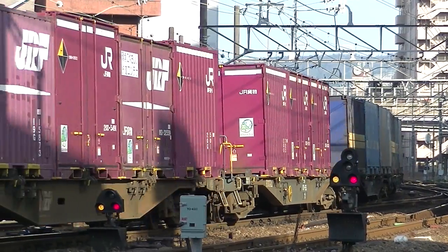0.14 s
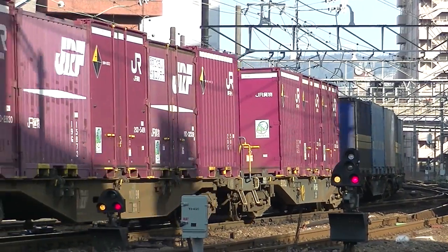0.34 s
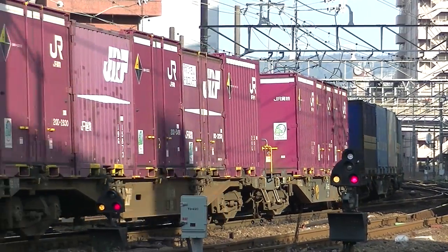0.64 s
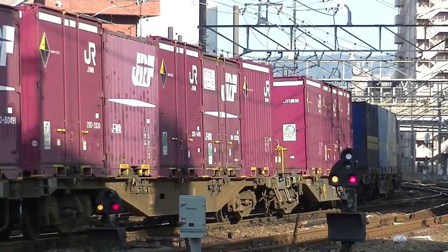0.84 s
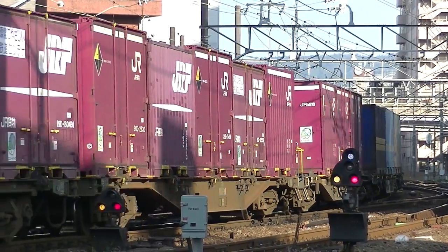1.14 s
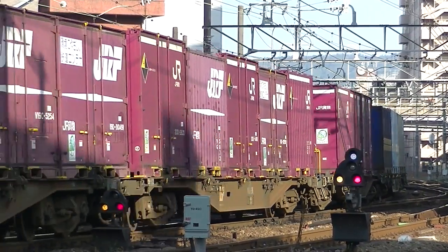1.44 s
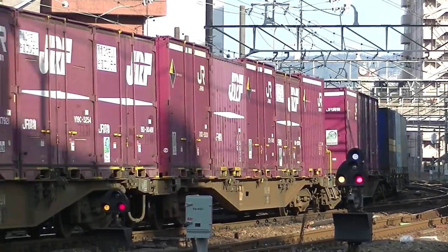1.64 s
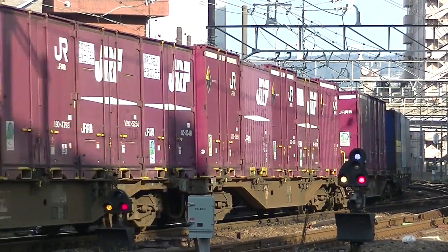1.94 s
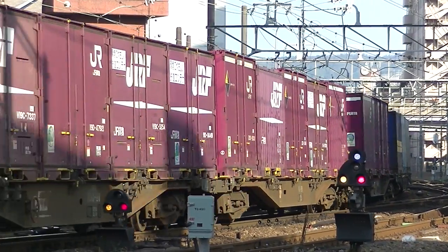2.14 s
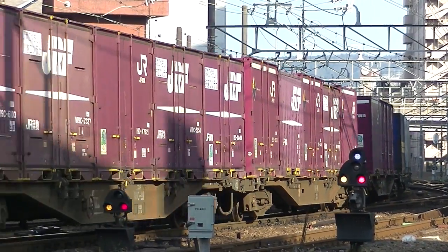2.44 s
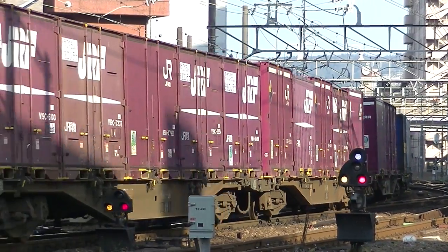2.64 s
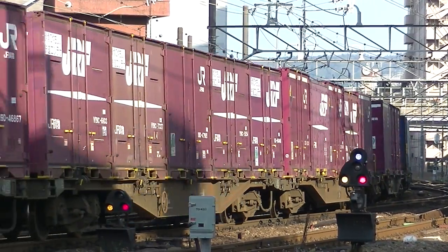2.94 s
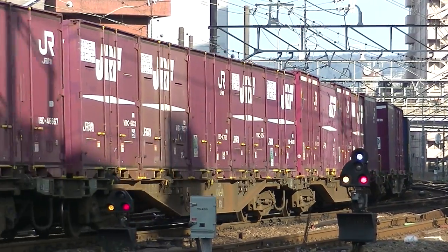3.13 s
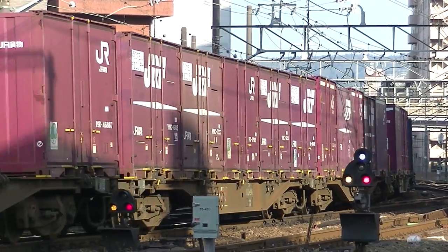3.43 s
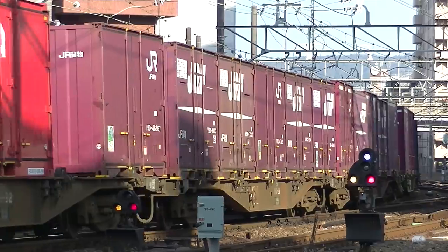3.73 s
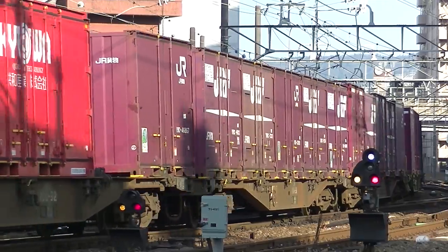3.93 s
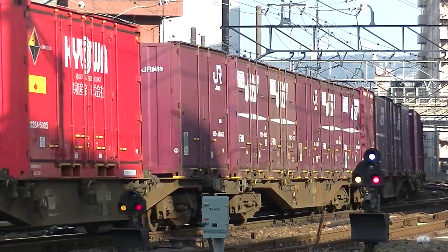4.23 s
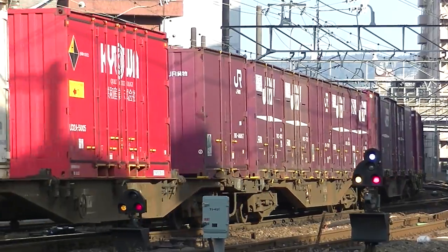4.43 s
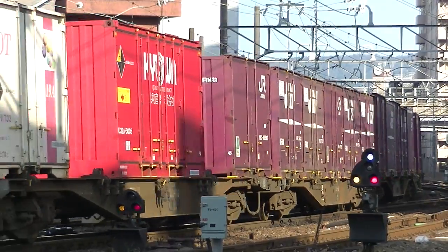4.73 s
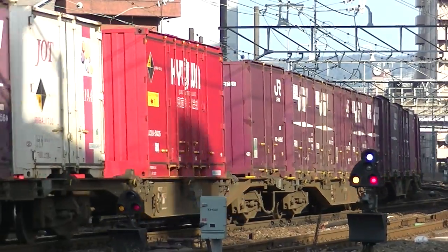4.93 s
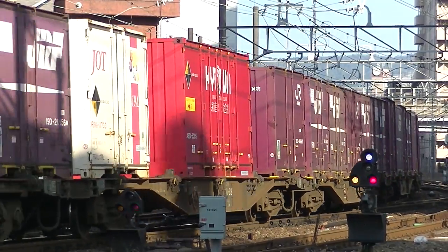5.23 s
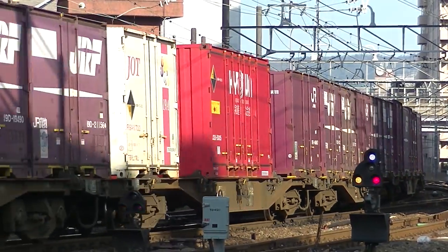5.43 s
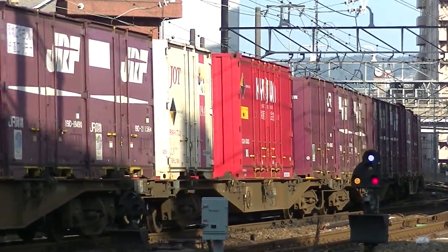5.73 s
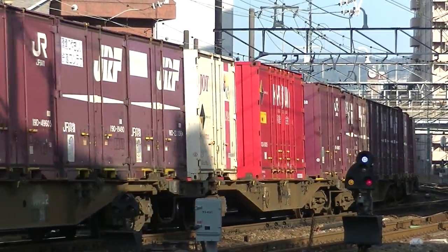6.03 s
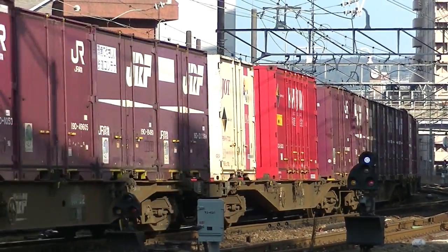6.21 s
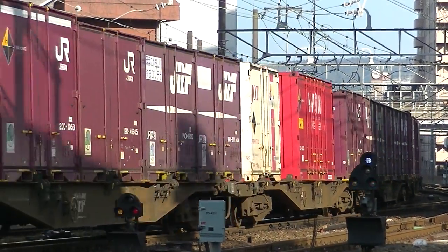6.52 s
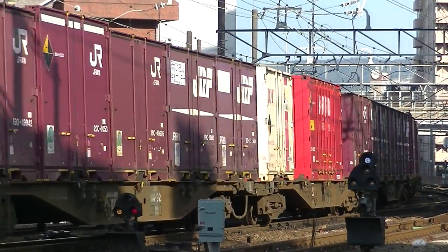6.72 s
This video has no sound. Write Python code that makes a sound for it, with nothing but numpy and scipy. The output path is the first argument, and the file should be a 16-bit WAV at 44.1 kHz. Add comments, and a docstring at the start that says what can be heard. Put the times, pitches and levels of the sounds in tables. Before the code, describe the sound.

A slow freight train rolls past with high, wavering wheel squeals and metallic scraping that ease off over rumbling and rail-joint knocks.

```python
"""Wheel flanges grind and squeal as container wagons crawl through a curved yard track a few metres away.
The flanges scrape the rail and ring the steel wheels; single wheel modes break into stick-slip squeal.
Underneath, rough treads shake the wagon bodies and axles thump over rail joints. One dry snap sounds
close by. Wagon sides and yard scatter the train's sound into short echoes that widen it."""
import sys
import numpy as np
from scipy import signal
from scipy.fft import rfft, irfft, next_fast_len
from scipy.io import wavfile
from scipy.ndimage import uniform_filter1d

SR = 44100
rng = np.random.default_rng(int(sys.argv[2]) if len(sys.argv) > 2 else 0)


def waveform_to_disk(signal):
    """Save audio, clipped to [-1, 1], as 16-bit WAV at the path in sys.argv[1]."""
    frames = np.transpose(np.atleast_2d(signal))
    scaled = np.clip(frames, -1, 1) * 32767
    samples = np.round(scaled).astype(np.int16)
    wavfile.write(sys.argv[1], SR, samples)


N = 302967
T = np.arange(N) / SR


def undb(db):
    return 10 ** (np.asarray(db) / 20)


def unit(x):
    """Scale to rms 1."""
    return x / np.sqrt(np.mean(np.abs(x) ** 2))


def butter(x, order, hz, kind="lowpass"):
    return signal.sosfilt(signal.butter(order, hz, kind, fs=SR, output="sos"), x)


def colour(x, points):
    """Filter by (f/Hz, gain/dB) points joined on a log-frequency axis."""
    hz, db = np.transpose(points)
    size = next_fast_len(len(x))
    bin_hz = np.maximum(np.arange(size // 2 + 1) * SR / size, 1)
    gain = undb(np.interp(np.log(bin_hz), np.log(hz), db))
    return irfft(rfft(x, size) * gain, size)[:len(x)]


def ring(x, hz, width_hz):
    """One resonance, gain 1 at its centre."""
    return signal.lfilter(*signal.iirpeak(hz, hz / width_hz, fs=SR), x)


def walk(rate_hz, size=N):
    """Random steps, smoothed twice; spread near 1."""
    hold = int(SR / rate_hz)
    steps = np.repeat(rng.standard_normal(size // hold + 1), hold)
    return 1.15 * uniform_filter1d(uniform_filter1d(steps, hold), hold)[:size]


def air():
    """Faint deep stir on the microphone, independent left and right."""
    return unit(butter(rng.standard_normal((2, N)), 4, 100)) * undb(-77)


# Echo against direct sound: f/Hz, gain/dB
ECHO_SPECTRUM = [(60, -55), (200, -11), (380, -7), (700, -15), (1290, -14.5), (2380, -13), (4400, -17.5),
                 (8120, -15.5), (15000, -39)]


def yard_echo(train, t60_s=0.23):
    """Wagon sides and yard scatter the sound into a short diffuse tail."""
    t = T[:SR // 2]
    tail = rng.standard_normal(len(t)) * np.exp(-np.log(1000) * t / t60_s)
    tail /= np.sqrt(np.sum(tail ** 2))
    return colour(signal.fftconvolve(train, tail)[:N], ECHO_SPECTRUM)


# Left minus right, before frequency weighting: t/s, level/dB
BALANCE = [(0, 3), (2.5, 0.3), (5.3, -.5), (6.87, 0)]
# Quarter-cycle share by which the left microphone port leads: f/Hz, gain/dB
LEFT_LEAD = [(120, -44), (340, -47), (600, -50), (1200, -13)]


def direction(train):
    """Side signal: the train leans left at first, and the left port leads in phase."""
    ratio = undb(np.interp(T, *np.transpose(BALANCE)))
    lean = (ratio - 1) / (ratio + 1) * colour(train, [(100, -19), (3000, 7.5), (4500, 0), (15000, -31)])
    lead_band = colour(train, [(40, -60), *LEFT_LEAD, (3000, -60)])
    lead = -signal.hilbert(lead_band, next_fast_len(N))[:N].imag
    return lean + lead


# Modes of a tiny object: f/Hz, level/dB, t60/s
TICK_MODES = [(4000, -2, .003), (6600, -2, .003), (8600, 0, .003), (11000, -4, .002), (13500, -7, .0015)]


def snap(start_s=4.1241, gap_s=0.00046, peak_db=-4.5):
    """Two ticks ring a few very short modes; a tiny object radiates no bass."""
    t = np.maximum(T - start_s, 0)
    tick = sum(undb(db) * np.sin(2 * np.pi * hz * t) * np.exp(-np.log(1000) * t / t60_s)
               for hz, db, t60_s in TICK_MODES)
    pair = butter(tick + np.roll(tick, int(gap_s * SR)), 4, 3000, "highpass")
    return undb(peak_db) * pair / np.abs(pair).max()


# Axle blows: t/s, thud level/dB, clack level/dB
AXLE_BLOWS = [(.08, -40, -37), (.52, -41.5, -47), (.786, -49, -26), (.919, -46, -34.5), (1.128, -45, -34),
              (1.39, -52, -45), (1.548, -38.5, -32.5), (2.395, -41, -34.5), (2.489, -43.5, -37),
              (2.999, -49, -37), (3.24, -40, -41), (3.679, -42, -37), (3.55, -54, -56), (3.88, -39, -33.5),
              (4.379, -41, -37), (4.499, -38.5, -38.5), (4.599, -41, -35.5), (5.178, -42, -39),
              (5.392, -37.5, -39), (5.785, -40.5, -54), (6.016, -38.5, -38), (6.109, -38.5, -35.5),
              (6.458, -43.5, -40), (6.66, -53, -39.5)]
# Rail and wheel web modes: f/Hz
CLACK_MODES_HZ = [1070, 1560, 2060, 2430, 2910, 3410]


def rail_joints(thud_hz=449, thud_width_hz=370, clack_width_hz=280):
    """Each axle blow at a joint: a soft thud of the wagon floor and a rattling steel clack."""
    out, t = np.zeros(N), T[:SR // 5]
    soft = (1 - np.exp(-t / 0.0021)) * np.exp(-t / 0.053)
    sharp = (1 - np.exp(-t / 0.004)) * np.exp(-t / 0.035)
    for start_s, thud_db, clack_db in AXLE_BLOWS:
        floor_noise, steel_noise = rng.standard_normal((2, len(t)))
        thud = ring(ring(floor_noise * soft, thud_hz, thud_width_hz), thud_hz, thud_width_hz)
        rattle = steel_noise * sharp * undb(4 * walk(250, len(t)))
        clack = sum(ring(ring(rattle, hz, clack_width_hz), hz, clack_width_hz) for hz in CLACK_MODES_HZ)
        blow = undb(thud_db) * unit(thud) + undb(clack_db) * unit(clack)
        start = int(start_s * SR)
        out[start:start + len(t)] += blow[:N - start]
    return out


# Rumble spectrum: f/Hz, level/dB
RUMBLE_SPECTRUM = [(24, -74), (40, -44), (86, -40), (165, -10.5), (325, -3), (386, 1.5), (555, -1),
                   (1250, -4.5), (1740, -3.5), (2000, -2), (2500, -4.5), (3250, -25), (5500, -120)]
# Rumble envelope: t/s, level/dB
RUMBLE_LEVEL = [(0.0, -32.5), (0.61, -33.5), (1.01, -28.5), (1.7, -34.5), (2.2, -34), (2.33, -31),
                (3.88, -30.5), (4.15, -34), (4.36, -31.5), (4.48, -31.5), (4.95, -32.5), (5.99, -30.5),
                (6.31, -37), (6.5, -36), (6.64, -33), (6.87, -34)]


def rumble():
    """Rough treads shake wagon bodies, rails and sleepers."""
    shake = colour(rng.standard_normal(N), RUMBLE_SPECTRUM) * undb(walk(9))
    return unit(shake) * undb(np.interp(T, *np.transpose(RUMBLE_LEVEL)))


# Steel wheel mode families: f/Hz, level/dB
WHEEL_MODES = [(2060, -3), (2480, -1), (2950, -1.5), (3250, 3), (3990, 4.5), (4330, 3), (4900, 0),
               (5150, -6), (6080, -6.5), (6620, -12), (7100, -8.5), (7350, -34), (8250, -7), (8900, -13.5),
               (9400, -18.5), (10400, -15), (12200, -15), (13300, -19), (14100, -13.5)]


def wheel_ring(rub_s=0.8, wheels_at_once=2, wear_spread=0.02):
    """Wheel after wheel takes the curve, each ringing its own modes, detuned by wear."""
    span = int(rub_s * SR)
    out = np.zeros(N + 2 * span)
    for start in range(0, N + span, span // wheels_at_once):
        scrape, wheel = rng.standard_normal(span), 0
        for hz, db in WHEEL_MODES:
            worn_hz = hz * (1 + wear_spread * rng.standard_normal())
            mode = unit(ring(scrape, worn_hz, width_hz=95 - 0.005 * hz))
            wheel += undb(db + 3.5 * walk(10, span)) * mode
        out[start:start + span] += wheel * np.sqrt(np.hanning(span))
    return unit(out[span:span + N])


# Flange rasp spectrum: f/Hz, level/dB
RASP_SPECTRUM = [(900, -24.5), (1500, -12), (2000, 3), (3300, 3), (5100, -2), (6000, -4.5), (7300, -12),
                 (7800, -18), (10000, -15), (15500, -65)]
# Flange contact: t/s, grind level/dB, treble re grind/dB
FLANGE_CONTACT = [(0, -18.5, -11), (.17, -21.5, -13.5), (.21, -18.5, -11), (.5, -19, -11), (.67, -16, -14),
                  (.75, -21, -13), (.87, -22, -16), (1.11, -24.5, -13), (1.35, -20, -18),
                  (1.39, -17.5, -15.5), (1.59, -20, -19.5), (1.62, -15.5, -13), (1.68, -18.5, -17),
                  (1.74, -18, -12.5), (2.15, -15, -14.5), (2.4, -21.5, -12.5), (2.58, -29, -16),
                  (2.89, -29.5, -23), (3.21, -30.5, -22), (3.25, -27, -25), (3.44, -28.5, -20),
                  (3.5, -24, -12.5), (3.66, -25.5, -15), (3.83, -30, -20), (3.88, -26.5, -18.5),
                  (4.07, -31, -24.5), (4.28, -29, -21), (4.33, -27, -19), (4.45, -24, -21.5),
                  (4.72, -26.5, -23), (4.9, -25.5, -17), (5.13, -28, -19.5), (5.38, -27, -21.5),
                  (5.43, -23.5, -19.5), (5.7, -20.5, -16), (6.01, -26.5, -24.5), (6.05, -25, -20),
                  (6.24, -34, -28), (6.29, -27.5, -29), (6.43, -32, -18), (6.48, -28.5, -21.5),
                  (6.62, -33, -22.5), (6.73, -30.5, -24), (6.87, -39, -28)]


def flange_grind(edge_hz=5600, treble_hz=7700):
    """Flanges rasp on the rail and ring the wheels; harder contact is brighter. Returns sound, level."""
    times_s, levels_db, trebles_db = np.transpose(FLANGE_CONTACT)
    grind_db, treble_db = np.interp(T, times_s, levels_db), np.interp(T, times_s, trebles_db)
    rasp = unit(colour(rng.standard_normal(N) * undb(1.7 * walk(60)), RASP_SPECTRUM))
    steel = rasp + undb(-0.5) * wheel_ring()
    low = unit(butter(steel, 8, edge_hz))
    edge = unit(butter(steel, 6, [edge_hz, treble_hz], "bandpass")) * undb(0.36 * treble_db - 1)
    treble = unit(butter(steel, 8, treble_hz, "highpass")) * undb(treble_db)
    return undb(grind_db) * (low + edge + treble), grind_db


def stick_slip(hz, size, roughness, wander_hz):
    """Self-excited mode, rms near 1: pitch wanders and chatter smears it, the rougher the wider."""
    phase = 2 * np.pi * np.cumsum(hz + wander_hz * walk(39.3, size)) / SR
    slip = rng.standard_normal(size) + 1j * rng.standard_normal(size)
    width_hz = 55 * roughness
    chatter = unit(signal.lfilter([1], [1, -np.exp(-np.pi * width_hz / SR)], slip))
    return np.sqrt(2 / (1 + roughness ** 2)) * np.real((1 + roughness * chatter) * np.exp(1j * phase))


# Long squeal envelope: t/s, level/dB
LONG_SQUEAL_LEVEL = [(0, -24.5), (.16, -27), (.2, -16.5), (.34, -21.5), (.75, -26), (.87, -18.5),
                     (1.1, -20), (1.28, -18.5), (1.6, -15), (1.83, -24)]


def long_squeal(hz=5129, fade_s=0.027):
    """One wheel mode sings on through the opening."""
    times_s, levels_db = np.transpose(LONG_SQUEAL_LEVEL)
    envelope = undb(np.interp(T, times_s, levels_db)) * np.clip((times_s[-1] - T) / fade_s, 0, 1)
    return stick_slip(hz, N, roughness=0.6, wander_hz=13) * envelope


# Squeals of single wheel modes: t/s, length/s, f/Hz, level/dB
SHORT_SQUEALS = [(0.157, 0.32, 2090, -28.5), (0.187, 0.066, 3030, -19), (.2, 0.21, 3306, -19),
                 (.22, 0.28, 7340, -29), (0.238, 0.29, 5214, -16.5), (0.241, 0.36, 4110, -20.5),
                 (.36, .2, 8500, -35), (0.339, 0.56, 6970, -24.5), (0.388, 0.18, 3045, -19),
                 (0.553, 0.28, 6900, -30), (0.569, 0.11, 2590, -27.5), (.61, 0.29, 8200, -37),
                 (0.676, 0.29, 3360, -25.5), (.77, 0.3, 8600, -36.5), (0.944, 0.65, 3386, -30.5),
                 (.4, .4, 12790, -45), (1.62, 0.18, 4400, -27), (1.62, 0.12, 9460, -30),
                 (1.62, 0.38, 2493, -18.5), (1.618, 0.29, 3210, -18), (1.61, 0.12, 10550, -36),
                 (1.62, 0.22, 11510, -37), (1.609, .28, 6770, -31), (1.617, 0.19, 7260, -21),
                 (1.617, 0.49, 4040, -21.5), (1.67, .1, 8400, -45), (1.684, 0.29, 7310, -28),
                 (1.747, 0.27, 6940, -24), (1.718, 0.26, 5016, -19.5), (1.759, 0.34, 2043, -19),
                 (1.81, .15, 5820, -26), (1.88, 0.4, 4810, -24), (1.677, 0.47, 8960, -36.5),
                 (1.858, 0.52, 9350, -32.5), (1.9, 0.46, 5070, -19), (1.92, 0.35, 2447, -21.5),
                 (1.967, 0.48, 6670, -29), (1.976, 0.2, 3010, -22.5), (2.08, 0.36, 4850, -25),
                 (2.14, 0.37, 13280, -38), (2.172, .19, 8980, -34.5), (2.693, 0.037, 2600, -27),
                 (3.06, .4, 14050, -54), (3.453, 0.22, 3960, -28), (3.549, 0.41, 2040, -32),
                 (4.298, 0.088, 6110, -32.5), (4.819, 0.32, 6110, -26.5), (4.86, .27, 8100, -45),
                 (5.438, 0.33, 6080, -26.5), (5.499, 0.31, 4000, -26), (5.501, 0.4, 4960, -27.5),
                 (5.57, 0.3, 2940, -27), (5.58, 0.27, 2154, -28.5), (5.63, 0.24, 2504, -29.5),
                 (5.655, 0.26, 6670, -31), (6.268, 0.2, 6020, -35), (6.267, 0.15, 3935, -25.5),
                 (6.272, 0.087, 2940, -30), (6.27, .13, 7040, -40), (6.298, 0.15, 2130, -33.5)]


def short_squeals(grind_db, bite_db=-1, end_db=-11.5, swell_share=0.46, light_db=-24, firm_db=-18):
    """Each squeal bites, swells and dies back; light flange contact chatters more than firm."""
    out = np.zeros(N)
    for start_s, length_s, hz, db in SHORT_SQUEALS:
        start, t = int(start_s * SR), T[:int((length_s + 0.04) * SR)]
        span = slice(start, start + len(t))
        envelope = undb(db + np.interp(t, [0, swell_share * length_s, length_s], [bite_db, 0, end_db]))
        fades = np.clip(np.minimum(t / 0.006, (t[-1] - t) / 0.03), 0, 1)
        roughness = np.interp(grind_db[span].mean(), [light_db, firm_db], [2.0, 0.65])
        out[span] += stick_slip(hz, len(t), roughness, wander_hz=10) * envelope * fades
    return out


def scene():
    """Train and snap in the middle; echo and direction as the stereo side signal."""
    bodies = rumble()
    grind, grind_db = flange_grind()
    train = bodies + grind + long_squeal() + short_squeals(grind_db) + rail_joints()
    side = yard_echo(train) + direction(train)
    return train + snap() + side * np.array([[1], [-1]])


def record(dry):
    """Microphone bass cut and housing dip, uneven preamp saturation, air, steep top cut."""
    mic = butter(dry, 4, 140, "highpass")
    mic -= 0.75 * ring(mic, hz=5480, width_hz=390)
    saturated = np.tanh(0.62 * mic) / 0.57 + 0.006 * mic ** 2
    dc_free = butter(saturated + air(), 1, 15, "highpass")
    top_cut = signal.ellip(10, 0.2, 70, 15850, fs=SR, output="sos")
    return np.clip(signal.sosfilt(top_cut, dc_free), -1, 1)


dry = scene()
out = record(dry)
waveform_to_disk(out)
```